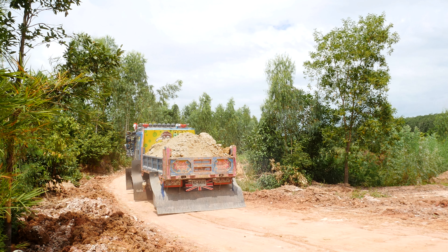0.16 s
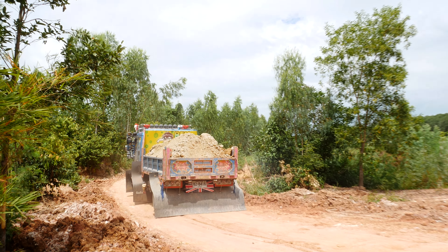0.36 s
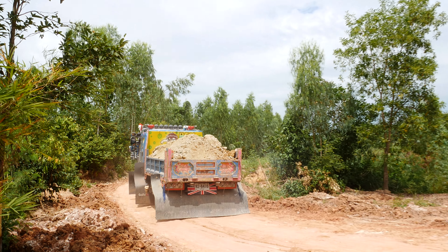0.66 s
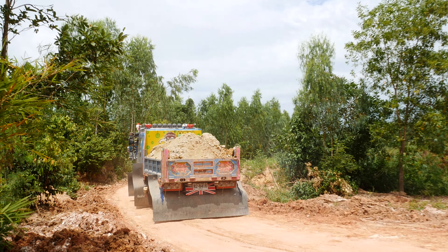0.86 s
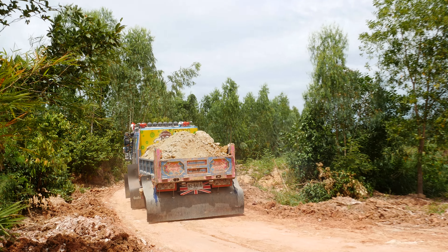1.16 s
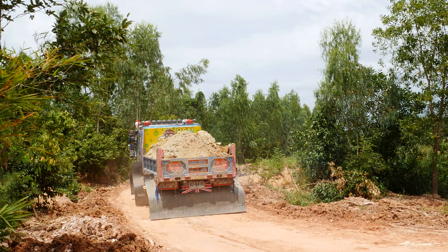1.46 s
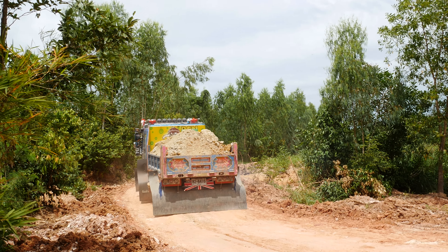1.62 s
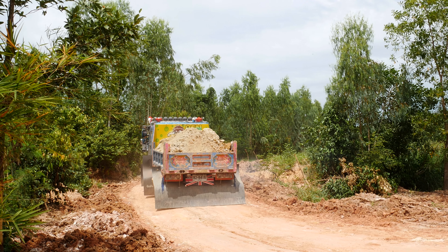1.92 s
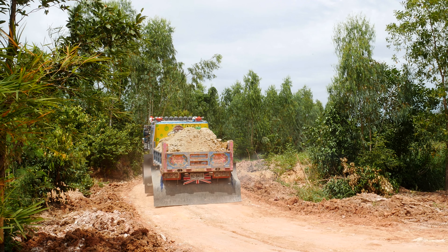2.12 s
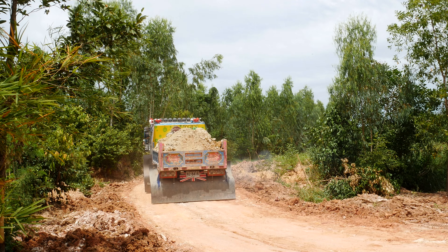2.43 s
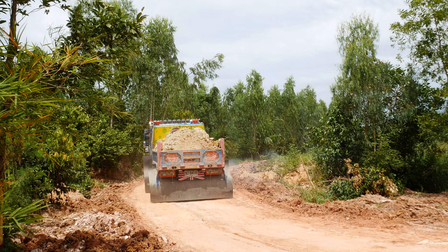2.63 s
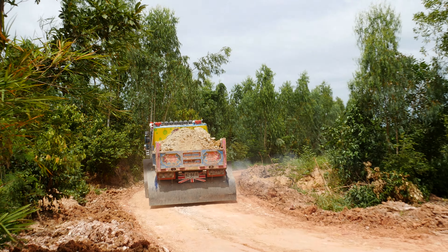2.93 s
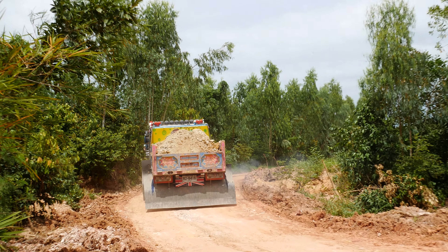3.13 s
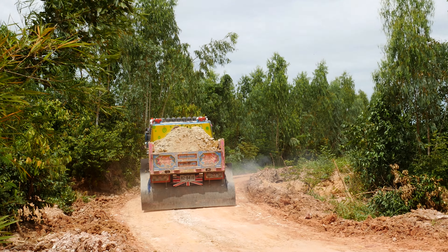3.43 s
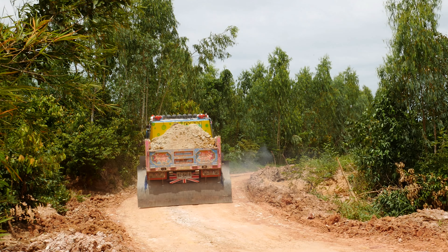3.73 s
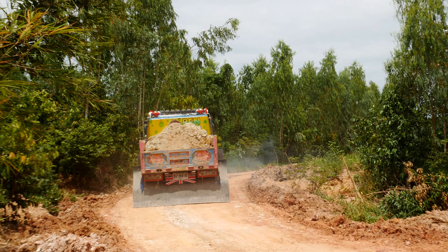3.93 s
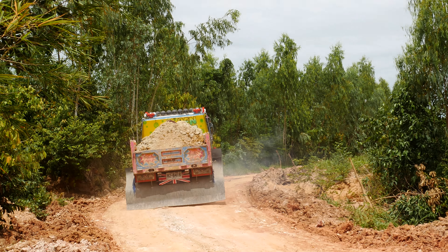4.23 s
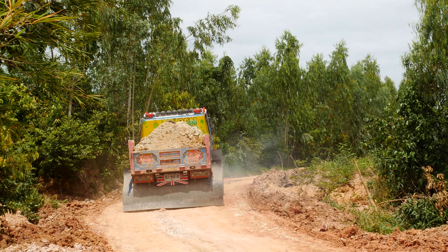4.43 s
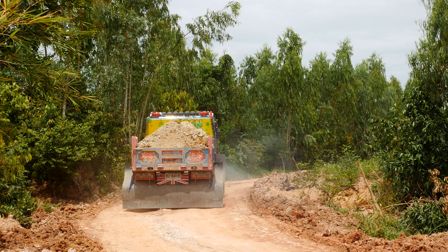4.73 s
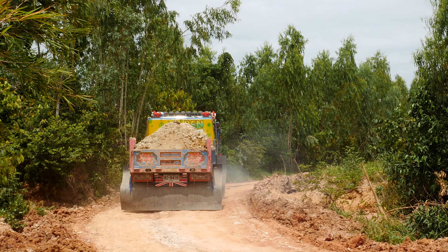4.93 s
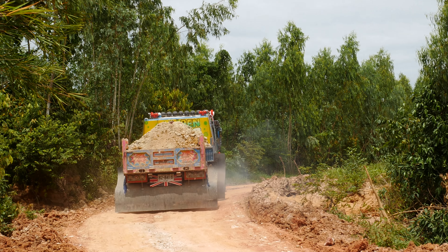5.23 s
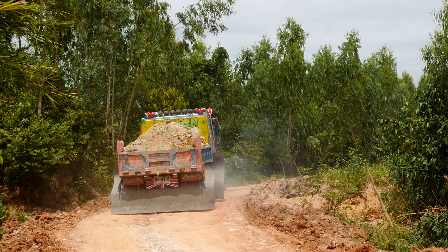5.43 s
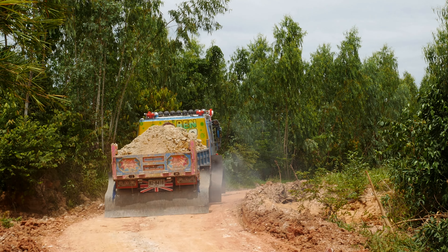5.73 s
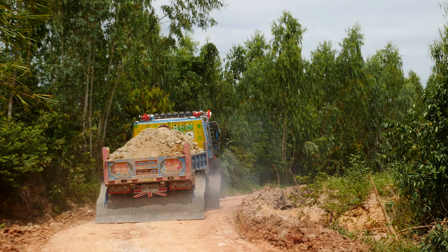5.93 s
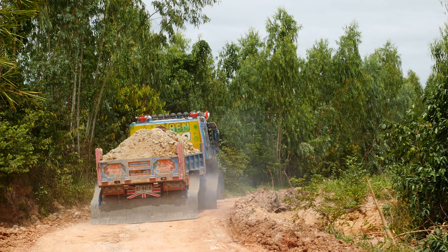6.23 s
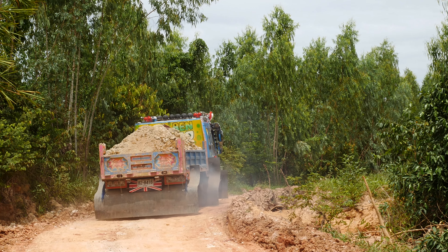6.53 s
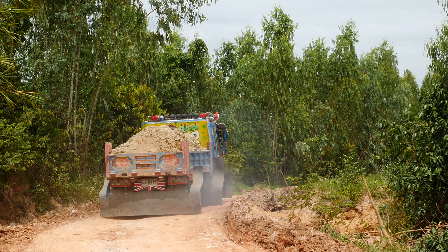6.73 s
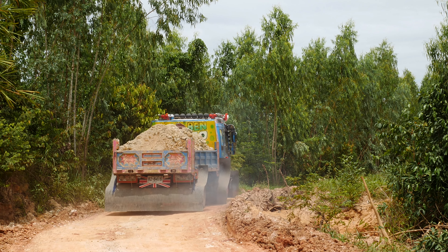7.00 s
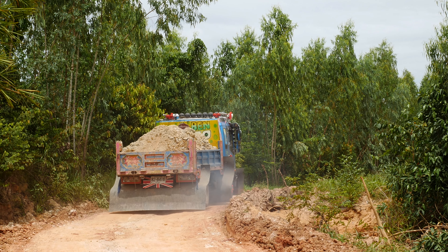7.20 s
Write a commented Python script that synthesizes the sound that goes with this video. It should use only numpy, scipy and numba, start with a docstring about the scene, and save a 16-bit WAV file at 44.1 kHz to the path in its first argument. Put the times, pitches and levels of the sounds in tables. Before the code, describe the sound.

A heavy diesel truck growls along a rough track, heard from behind in the open. A rapid, droning exhaust boom swells and sinks unevenly; loose steel rattles and tyres crunch faintly. A dull body thump comes early, metal grates briefly, then hard throttle brings raspy barks, crackling and spitting gas mid-way. Afterwards the rumble thins and moderate revs continue with buzzing rattles, leaving only a faint, short scatter from the trees.

```python
"""A loaded dump truck growls and barks away up a dirt road between trees, the driver pumping the throttle.
Each firing rings the exhaust pipe on one booming note; hard pushes add a bark, then cracks and a pulsing hiss.
Filtered noise makes the body rumble, engine clatter and tyre grit; random knocks ring loose steel and a tailgate.
Single blows thump the body, and noise bursts at each firing buzz a loose plate.
A gain control pulls all of this down under each loud push."""
import sys
import numpy as np
from scipy import signal
from scipy.fft import rfft, irfft
from scipy.io import wavfile
from scipy.ndimage import uniform_filter1d
from numba import njit

SR = 44100
rng = np.random.default_rng(int(sys.argv[2]) if len(sys.argv) > 2 else 0)


def bounce(signal):
    """Save signal as a 16-bit WAV file at the path given by the first command-line argument."""
    frames = np.transpose(np.atleast_2d(signal))
    limited = np.clip(frames, -1, 1)
    pcm = np.round(limited * 32767).astype(np.int16)
    wavfile.write(sys.argv[1], SR, pcm)


N = 324576
T = np.arange(N) / SR  # time [s]


def undb(db):
    """Decibels to gain."""
    return 10 ** (np.asarray(db) / 20)


def unit(x):
    """Scale to rms 1."""
    return x / np.sqrt(np.mean(x ** 2))


def curves(table):
    """The columns of a table, joined by straight lines in time."""
    s, *columns = np.transpose(table)
    return [np.interp(T, s, column) for column in columns]


def noise():
    """White noise."""
    return rng.standard_normal(N)


def walk(rate):
    """Smooth random wandering, spread near 1, with about `rate` new values a second."""
    hold = int(SR / rate)
    steps = np.repeat(rng.standard_normal(N // hold + 1), hold)
    return 1.5 * uniform_filter1d(steps, hold)[:N]


def colour(x, tone):
    """Causal minimum-phase filter with the given (frequency [Hz], level [dB]) spectrum."""
    hz, db = np.transpose(tone)
    octave = np.log2(np.maximum(np.fft.rfftfreq(2048, 1 / SR), 10))
    below = np.maximum(np.log2(hz[0]) - octave, 0)
    above = np.maximum(octave - np.log2(hz[-1]), 0)
    # outside the table the level falls a further 24 dB an octave
    level_db = np.interp(octave, np.log2(hz), db) - 24 * (below + above)
    # folding the cepstrum onto positive times makes the filter causal
    cepstrum = irfft(np.log(undb(level_db)))
    cepstrum[1:] *= 2
    cepstrum[len(cepstrum) // 2:] = 0
    return signal.fftconvolve(x, irfft(np.exp(rfft(cepstrum))))[:N]


def ring(x, modes, order=1):
    """Parallel (frequency [Hz], width [Hz], level [dB]) resonances; order 2 gives steep skirts."""
    total = 0
    for hz, width, db in modes:
        peak = np.concatenate(signal.iirpeak(hz, hz / width, fs=SR))
        total = total + undb(db) * signal.sosfilt([peak] * order, x)
    return total


def grains(rate, spread_db):
    """Random clicks of unequal size, on average `rate` a second."""
    size = undb(spread_db * np.minimum(rng.exponential(size=N), 3))
    return (rng.random(N) < rate / SR) * np.sign(noise()) * size


def bursts(pulses, decay_s):
    """A short, fresh burst of noise after each pulse."""
    decays = signal.lfilter([1], [1, -np.exp(-1 / (decay_s * SR))], pulses)
    return unit(noise() * decays)


def spells(table, attack_s, release_s):
    """Gain of (start [s], hold [s], level [dB]) rows: each ramps up, holds and dies away."""
    total = 0
    for s, hold_s, db in table:
        attack = np.clip((T - s) / attack_s, 0, 1)
        release = np.exp(-np.maximum(T - s - hold_s, 0) / release_s)
        total = total + undb(db) * attack * release
    return total


def pan(x, left_db):
    """Place a sound between the two channels; left_db is the lead of the left over the right."""
    return x * undb(np.array([[left_db], [-left_db]]) / 2)


def wide(make, side_db):
    """Two draws of a random sound as middle and side."""
    return unit(make()) + undb(side_db) * unit(make()) * np.array([[1], [-1]])


# pushes of the throttle: (start [s], top [s], fall before stretching [s], firing rate gain before bite [Hz],
# boom level before bite [dB], relative bark level [dB])
PUSHES = [(0.127, 0.275, 0.17, 0.9, -19.5, -52), (0.649, 0.722, 0.15, 1.01, -15, -31.5),
          (0.993, 1.18, 0.26, 1, -27.5, -48), (1.508, 1.585, 0.1, 1.17, -10.5, -40),
          (1.958, 2.03, 0.26, 1.906, -10, -33.5), (2.521, 2.629, 0.15, 0.69, -19.5, -45.5),
          (3.098, 3.2528, 0.14, 5.8, -4.5, -26.5), (3.635, 3.7972, 0.19, 5.7, -7.5, -28.5),
          (3.989, 4.062, 0.048, 1.1, -22, -30.5), (4.05, 4.1612, 0.19, 6.7, -8.5, -24),
          (4.462, 4.524, 0.11, 0.21, -22, -64), (4.585, 4.703, 0.14, 2.98, -12, -31),
          (5.036, 5.147, 0.15, 0.82, -17.5, -56), (5.506, 5.649, 0.13, 0.4, -17.5, -47),
          (5.937, 6.048, 0.22, 0.54, -17.5, -45.5), (6.28, 6.327, 0.037, 0.24, -26, -53),
          (6.372, 6.436, 0.16, 0.88, -11, -38.5), (6.81, 6.851, 0.043, 0.26, -21.5, -42),
          (6.884, 6.9936, 0.12, 1.9, -13.5, -31.5), (7.276, 7.348, .1, 1.7, -18.5, -45)]
BITE_S = .006  # time scale on which the engine takes up each push


def pushes(sizes, rise, fall):
    """Each push bites abruptly, then swells and sinks as a bell curve; rise and fall stretch its two sides."""
    total = 0
    for size, (start_s, top_s, fall_s, *_) in zip(sizes, PUSHES):
        width_s = np.where(T < top_s, rise * (top_s - start_s), fall * fall_s)
        bite = .5 + .5 * np.tanh((T - start_s) / (2 * BITE_S))
        total = total + size * bite * np.exp(-((T - top_s) / width_s) ** 2)
    return total


def push_at(s):
    """Row of the push that is under way at the given times."""
    return np.maximum(np.searchsorted(np.transpose(PUSHES)[0], s) - 1, 0)


# hard firings that knock out of the pipe: (start [s], hold [s], relative bark level [dB])
KICKS = [(1.97, .008, -46), (2.024, 0.012, -47), (3.146, .005, -40), (3.28, 0.037, -33), (3.64, .008, -42),
         (3.948, 0.029, -34.5), (4.308, 0.0073, -36), (4.785, .03, -44), (5.139, 0.022, -40),
         (6.041, 0.028, -44.5), (6.376, 0.022, -43), (6.484, 0.024, -45), (6.539, .008, -45),
         (6.935, .008, -38), (7.005, 0.061, -40.5)]
KICK_ATTACK_S, KICK_RELEASE_S = .003, .012
IDLE_BOOM_DB = -38.5  # pipe note between pushes


def throttle():
    """What the pedal drives: firing rate above idle (Hz), gain of the boom, and the briefer gain of the bark."""
    rev_gain_hz, boom_db, bark_db = np.transpose(PUSHES)[3:]
    rev_hz = pushes(rev_gain_hz, rise=.85, fall=.863)
    boom_pushes = pushes(undb(boom_db), rise=1.21, fall=1.135)
    swell = undb(IDLE_BOOM_DB) + boom_pushes * undb(.13 * walk(13))
    load = pushes(undb(bark_db), rise=.85, fall=.63) + spells(KICKS, KICK_ATTACK_S, KICK_RELEASE_S)
    return rev_hz, swell, load


IDLE_HZ = 54.3  # firings per second between pushes
SLIP_S = .09  # the firings slip into line over this long before each push


def firing_count(rev_hz):
    """Firings so far; the engine's phase slips just before each push, so that a firing falls on its top."""
    count = np.cumsum(IDLE_HZ + rev_hz) / SR
    lead = np.unwrap(np.interp(np.transpose(PUSHES)[1], T, count) % 1, period=1)
    return count - uniform_filter1d(lead[push_at(T + SLIP_S / 2)], int(SLIP_S * SR))


# uneven cylinders, repeating every third firing: (relative strength [dB])
CYLINDERS = [2.3, -.5, -1.6]
# the engine runs smoother at speed: (firing rate [Hz], share of the unevenness [0-1])
LUMPINESS = [(55.5, 1), (58.5, .3)]


def firings(phase, scatter_db, jitter_s, uneven):
    """One pulse per turn of the phase, a little off in time and strength; the cylinders even out as the revs rise."""
    turn = np.arange(1, int(phase[-1]) + 1)
    chance = rng.standard_normal((len(turn), 2))
    s = np.interp(turn, phase, T)
    # the cylinder order counts from the top of each push
    top_turn = np.round(np.interp(np.transpose(PUSHES)[1], T, phase)).astype(int)
    cylinder = (turn - top_turn[push_at(s)]) % len(CYLINDERS)
    lumpy = np.interp(1 / np.gradient(s), *np.transpose(LUMPINESS))
    at = np.clip((s + lumpy * jitter_s * chance[:, 0]) * SR, 0, N - 2)
    strength_db = uneven * np.array(CYLINDERS)[cylinder] + scatter_db * chance[:, 1]
    size = undb(lumpy * strength_db)
    # share each pulse between the two nearest samples
    i, part = at.astype(int), at % 1
    return np.bincount(i, size * (1 - part), N) + np.bincount(i + 1, size * part, N)


# resonances of the exhaust pipe: (frequency [Hz], width [Hz], relative level [dB])
PIPE = [(166.1, 34.6, 20.5), (120.8, 18, -1.5), (52, 11, -19.5)]


def pipe_boom(phase, swell):
    """The pipe sings on the third harmonic of the firings; the silencer evens out the cylinders."""
    # the low note swells just ahead of each shock
    early = firings(phase + .06, scatter_db=.7, jitter_s=.00003, uneven=.6)
    note = ring(early, PIPE, order=2)
    # hold the note level, so that the swell alone shapes it
    note /= np.sqrt(uniform_filter1d(note ** 2, SR // 8) + .01 * np.mean(note ** 2))
    return note * swell


def underside(x, decay_s, db):
    """Chassis and ground return each pulse as a tight cluster of echoes, the same for every firing."""
    t = T[:SR // 40]
    echoes = rng.standard_normal(len(t)) * np.exp(-t / decay_s)
    echoes /= np.sqrt(np.sum(echoes ** 2))
    return x + undb(db) * signal.fftconvolve(x, echoes)[:N]


RASP_DECAY_S, RASP_DB = .003, -3.5  # turbulence trailing each pulse; its level in the cracks
# spectrum of the bark: (frequency [Hz], relative level [dB])
BARK_TONE = [(180, -6.5), (290, 0), (410, 0), (505, 7.5), (610, 6), (700, 3), (800, 7), (930, 2.5),
             (1100, -5.5), (1300, -12), (1550, -25), (2500, -46), (6000, -100)]


def bark_of(pulses, load):
    """Under load, each pulse leaves as a coloured click with a trailing noise burst and close echoes."""
    gritty = unit(pulses) + undb(-15) * bursts(pulses, RASP_DECAY_S)
    return underside(unit(colour(gritty, BARK_TONE)), decay_s=.006, db=-11) * load * undb(3.8)


# overtones that blare as the revs rise: (frequency [Hz], width [Hz], relative level [dB])
BLARE = [(505, 62, 4), (604, 55, 0), (790, 60, -1), (855, 60, -3)]
BLARE_DB = -39.5  # level 1 Hz above idle; its power grows with the revs


def blare_of(pulses, rev_hz):
    """Pulses ring the pipe's upper overtones, louder with the revs."""
    return unit(ring(pulses, BLARE, order=2)) * np.sqrt(rev_hz) * undb(BLARE_DB)


# low overtones of the pipe, heard from near and from far: (frequency [Hz], width [Hz], relative level [dB])
CHEST_NEAR = [(210, 26, -1), (269, 40, 0.5), (335, 39, -3), (446.4, 19, 5)]
CHEST_FAR = [(233, 21, -10), (389.4, 28, -5), (501, 20, -13)]


def chest(pulses, load):
    """Pulses ring the low overtones under load; a second set takes over as the truck draws away."""
    near = unit(ring(pulses, CHEST_NEAR, order=2)) * undb(np.interp(T, [1.6, 3.3, 5], [4, -2, -12]))
    far = unit(ring(pulses, CHEST_FAR, order=2)) * undb(np.interp(T, [4.2, 4.7, 6.5], [-16, -5, 0]))
    return (near + far) * load


# hum while the truck is close: (time [s], level [dB])
NEAR_HUM = [(0, -31), (.9, -31.5), (1.6, -35), (2.9, -41), (4, -58)]
NEAR_HUM_HZ, NEAR_HUM_WIDTH_HZ = 221.8, 30


def near_hum(pulses):
    """The pipe's fourth harmonic hums, wavering in level."""
    hum = unit(ring(pulses, [(NEAR_HUM_HZ, NEAR_HUM_WIDTH_HZ, 0)], order=2))
    return hum * undb(curves(NEAR_HUM)[0] + 2 * walk(9))


# hardest pushes, where the pulses break into shocks: (start [s], hold [s], relative level [dB])
CRACKS = [(1.97, .13, -55), (3.145, 0.15, -33), (3.685, 0.15, -33.5), (4.058, 0.025, -29.5),
          (4.143, 0.12, -34), (4.31, 0.009, -33), (4.64, 0.071, -37), (4.737, 0.038, -45.5),
          (6.93, 0.03, -46), (6.981, 0.018, -38)]
CRACK_ATTACK_S, CRACK_RELEASE_S = .009, .016
CRACK_DB_PER_HZ = 1  # growth with the firing rate above idle


def cracking(rev_hz):
    """Gain of the shocks, growing with the firing rate."""
    return spells(CRACKS, CRACK_ATTACK_S, CRACK_RELEASE_S) * undb(CRACK_DB_PER_HZ * rev_hz)


# spectrum of the cracks: (frequency [Hz], relative level [dB])
CRACK_TONE = [(600, -15), (1100, -4), (1400, -3), (1750, .5), (2600, 1), (2950, -4.5), (3400, -14),
              (4500, -19), (6500, -36), (14000, -72)]


def shock_cracks(phase, rev_hz):
    """Steepened pulses, scattered in strength, crack with a rasp of turbulence and close echoes."""
    shocks = firings(phase, scatter_db=1.5, jitter_s=.00005, uneven=1)
    torn = unit(shocks) + undb(RASP_DB) * bursts(shocks, RASP_DECAY_S)
    crack = underside(unit(colour(torn, CRACK_TONE)), decay_s=.003, db=-7)
    return crack * cracking(rev_hz) * undb(-1.5)


# the pipe spits at the top of the hardest pushes: (time [s], relative hiss level [dB], relative snap level [dB])
SPITS = [(3.235, -42.5, -41), (3.25, -38.5, -42), (3.268, -33, -45), (3.78, -49, -35), (3.795, -35.5, -30),
         (4.161, -33.5, -25)]
SPIT_DECAY_S, SNAP_DECAY_S = .11, .003
# gas hisses from this far above idle; relative flow 1 Hz further up; power of the excess
JET_ABOVE_HZ, JET_DB, JET_LAW = 2.6, -41, .48
JET_OPEN_DB = -27  # relative flow at which the treble is fully open
# spectrum of the gas: (frequency [Hz], relative level [dB])
JET_TONE = [(1000, 0.5), (2500, -1.5), (3400, -6.5), (4300, -1.5), (6000, -10), (7800, -10), (9500, -6),
            (12500, -18.5), (15000, -40)]


def gas_jet(phase, rev_hz):
    """Noise puffs once per firing; the treble opens only at the strongest flow."""
    flow = np.maximum(rev_hz - JET_ABOVE_HZ, 0) ** JET_LAW * undb(JET_DB)
    for s, hiss_db, snap_db in SPITS:
        since = np.abs(T - s)
        hiss = undb(hiss_db) * np.exp(-since / SPIT_DECAY_S)
        snap = undb(snap_db) * np.exp(-since / SNAP_DECAY_S)
        flow = flow + (T > s) * (hiss + snap)
    puff = unit(.48 + uniform_filter1d(np.exp(-((phase + .06) % 1) / .16), 30))
    opening = np.minimum(flow / undb(JET_OPEN_DB), 1)
    gas = wide(lambda: colour(noise(), JET_TONE), side_db=-11)
    dull = signal.sosfilt(signal.butter(2, 5500, fs=SR, output="sos"), gas)
    blend = opening * gas + np.sqrt(1 - opening ** 2) * dull
    return blend * puff * flow * undb(4)


def exhaust(phase, rev_hz, swell, load):
    """The firings drive boom, bark, overtones, cracks and a pulsing jet of gas."""
    pulses = firings(phase, scatter_db=.9, jitter_s=.00002, uneven=1.1)
    low = pan(pipe_boom(phase, swell) + near_hum(pulses), .75)
    middle = pan(bark_of(pulses, load) + blare_of(pulses, rev_hz) + chest(pulses, load), 1.7)
    crack = pan(shock_cracks(phase, rev_hz), -1.7)
    # the pulsed layers enter with inverted polarity
    return gas_jet(phase, rev_hz) - low - middle - crack


# the truck drawing away over rough and smooth ground:
# (time [s], relative body rumble [dB], relative clatter [dB], relative tyre grit [dB])
ROLL = [(0, -28.5, -30, -49.5), (.35, -29.5, -35, -55.5), (.6, -28.5, -31.5, -49.5), (.95, -30, -33, -52),
        (1.35, -28, -29.5, -50.5), (1.9, -27.5, -32.5, -53.5), (2.35, -35, -36.5, -57.5),
        (3.05, -28.5, -28.5, -54.5), (3.55, -31, -28.5, -54.5), (4.4, -39, -36, -60.5), (5, -40, -40, -63),
        (5.7, -38.5, -37, -61.5), (6.3, -35.5, -34.5, -59), (7.36, -38.5, -39, -60.5)]
# resonances of the body: (frequency [Hz], width [Hz], relative level [dB])
BODY = [(178.3, 50, 5), (123.3, 27, -3.5), (361, 129, -4.5), (481, 44, -17)]


def body_rumble():
    """Noise from the ground rings the body."""
    rumble = wide(lambda: ring(noise(), BODY, order=2), side_db=-21.5)
    return pan(rumble * undb(curves(ROLL)[0] + 6), .6)


def low_rumble(db):
    """The deepest part of the rolling rumble, stronger on rough ground."""
    rumble = wide(lambda: ring(noise(), [(53, 12, 4.4), (96, 12, 1.8)], order=2), side_db=0)
    return rumble * undb(curves(ROLL)[0] + db)


# jolts of the tipper body: (time [s], strength of the blow [dB])
THUMPS = [(0.233, -18), (0.275, -5.5), (1.214, -18), (1.233, -31), (1.284, -13), (1.301, -15), (3.102, -26)]


def thumps():
    """Ruts jolt the loaded body: a short, dull blow each."""
    blows = np.zeros(N)
    for s, db in THUMPS:
        blows[int(s * SR)] = undb(db)
    sound = ring(blows, [(187, 54, 3), (368, 64, -18)], order=2)
    return sound * blows.max() / np.abs(sound).max()


def flutter(x):
    """Octave bands that swell and sink independently."""
    spectrum = rfft(x)
    octave = np.log2(np.maximum(np.fft.rfftfreq(N, 1 / SR), 1))
    bands = np.arange(7, 15)  # centres at powers of two, from 128 Hz
    total = 0
    for k in bands:
        band = irfft(spectrum * np.interp(octave, bands, bands == k), N)
        total = total + band * undb(1.5 * walk(18))
    return total


# spectrum of the clatter: (frequency [Hz], relative level [dB])
CLATTER_TONE = [(260, -15.5), (450, -6), (600, -10.5), (860, -9), (1050, -9), (1400, -15.5), (2000, -18),
                (2900, -20.5), (3400, -27.5), (7000, -47)]


def diesel_clatter(phase):
    """Noise beating twice per firing, mixed with random clicks."""
    beat = unit(1.5 + np.exp(-(2 * phase % 1) / .3))
    clatter = wide(lambda: colour(noise() * beat + 3 * grains(600, 2.4), CLATTER_TONE), side_db=-10)
    return pan(flutter(clatter * undb(curves(ROLL)[1] - 5.5)), .67)


# resonances of the loose steel: (frequency [Hz], width [Hz], relative level [dB])
STEEL = [(689, 187, 17), (1258, 79, 17), (1680, 160, 12), (1850, 87, 14), (2305, 64, 10), (2836, 210, 3),
         (2880, 74, -12), (4200, 590, -4)]


def loose_steel():
    """The same random knocks shake all panels, but each comes and goes by itself at its own place."""
    knocks = grains(320, 7.6)
    steel = 0
    for mode in STEEL:
        panel = ring(knocks, [mode], order=2) * undb(2.4 * walk(16))
        steel = steel + pan(panel, -1.5 + 3.5 * rng.standard_normal())
    return unit(steel) * undb(np.interp(T, [0, 3, 4.8, 5.5, 6.5], [-46, -45, -53.5, -48.5, -45.5]))


# the tailgate grates as the body twists: (middle [s], half length [s], level [dB])
GRATES = [(1.33, 0.23, -40), (1.838, 0.15, -43.5), (2.55, 0.11, -49), (2.985, 0.064, -41.5)]
# resonances of the tailgate: (frequency [Hz], width [Hz], relative level [dB])
TAILGATE = [(1530, 300, -3), (1890, 260, 0), (2270, 320, -1), (2780, 500, -5)]


def grating():
    """Steel grinds on steel in irregular catches, each resonance coming and going by itself."""
    catches = grains(700, 3.5)
    gain = sum(undb(db) * np.exp(-((T - s) / length_s) ** 2) for s, length_s, db in GRATES)
    sound = sum(ring(catches, [mode], order=2) * undb(1.5 * walk(20)) for mode in TAILGATE)
    return pan(unit(sound) * gain, -5)


# a loose plate buzzing with the engine: (time [s], level [dB])
BUZZ = [(0, -56), (4.8, -68), (5.7, -63), (6.35, -48), (6.6, -58.5), (6.85, -45), (7.05, -63), (7.3, -47.5)]
# resonances of that plate: (frequency [Hz], width [Hz], relative level [dB])
PLATE = [(2845, 230, -1.5), (2430, 660, -10), (1250, 120, -10)]


def plate_buzz(phase):
    """A loose plate chatters unevenly, shaken once by every firing."""
    shakes = bursts(firings(phase + .3, scatter_db=2, jitter_s=.0012, uneven=0), decay_s=.003)
    return pan(unit(ring(shakes, PLATE, order=2)) * undb(curves(BUZZ)[0]), -1.5)


# spectrum of the tyre grit: (frequency [Hz], relative level [dB])
GRIT_TONE = [(2500, -14), (4200, -10.5), (6000, -15), (7900, -16.5), (9300, -14.5), (11000, -14.5),
             (13000, -23.5), (15000, -32)]


def tyre_grit():
    """Tyres crush grit: bright noise and random clicks, flickering slightly in level."""
    grit = wide(lambda: colour(noise() + 2 * grains(900, 3), GRIT_TONE), side_db=-8)
    return pan(grit * undb(curves(ROLL)[2] + 4.5 + .39 * walk(29)), .7)


def trees(x, t60_s, db):
    """Trunks and leaves scatter a faint, dull tail, different on each side."""
    t = T[:SR]
    tails = rng.standard_normal((2, SR)) * undb(-60 * t / t60_s) * np.minimum(t / .0087, 1)
    tails /= np.sqrt(np.sum(tails[0] ** 2))
    tails = signal.sosfilt(signal.butter(2, [300, 4000], "band", fs=SR, output="sos"), tails)
    return undb(db) * signal.fftconvolve(x.mean(axis=0)[None], tails, axes=1)[:, :N]


ONSET_SWELL_S = 1.96  # middle of the swell


def onset_swell(length_s, db):
    """A brief swell of deep noise as the push near 2 s sets in."""
    swell = wide(lambda: ring(noise(), [(44.5, 58, 0)], order=2), side_db=-13)
    return swell * undb(db) * np.exp(-((T - ONSET_SWELL_S) / length_s) ** 2)


def scene():
    """The whole truck, its scatter among the trees and a brief swell of deep noise."""
    rev_hz, swell, load = throttle()
    phase = firing_count(rev_hz)
    pipe = exhaust(phase, rev_hz, swell, load)
    rolling = body_rumble() + low_rumble(db=-19.5) + thumps() + tyre_grit()
    rattling = diesel_clatter(phase) + loose_steel() + grating() + plate_buzz(phase)
    scatter = trees(pipe, t60_s=.2, db=-12)
    return pipe + scatter + rolling + rattling + onset_swell(length_s=.017, db=-39)


@njit
def follow(x, attack, release):
    """Level follower with separate rates for rising and sinking."""
    out, level = np.empty(len(x)), 0.
    for i in range(len(x)):
        level += (x[i] - level) * (attack if x[i] > level else release)
        out[i] = level
    return out


def gain_control(x, top_db, attack_s, release_s):
    """Turns everything down while the followed level is above the top level."""
    level = follow(np.abs(x).mean(axis=0), 1 / (attack_s * SR), 1 / (release_s * SR))
    return x * undb(top_db) / np.maximum(level, undb(top_db))


NOTCH_HZ, NOTCH_Q = 7900, 22
TOP_HZ = 15300  # edge of the low-pass


def record(dry):
    """The gain ducks under each loud boom, then a narrow notch and a steep low-pass trim the treble."""
    held = gain_control(dry, top_db=-9.5, attack_s=.00095, release_s=.26)
    held = signal.lfilter(*signal.iirnotch(NOTCH_HZ, NOTCH_Q, fs=SR), held)
    return signal.sosfilt(signal.ellip(8, .2, 70, TOP_HZ, fs=SR, output="sos"), held)


dry = scene()
out = record(dry)
bounce(out)
```